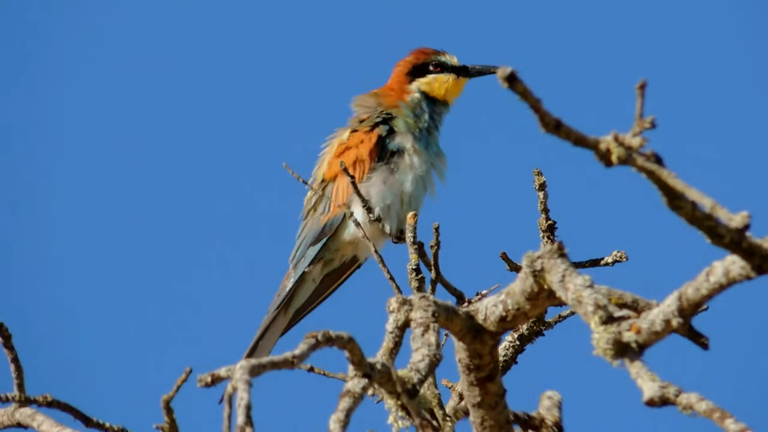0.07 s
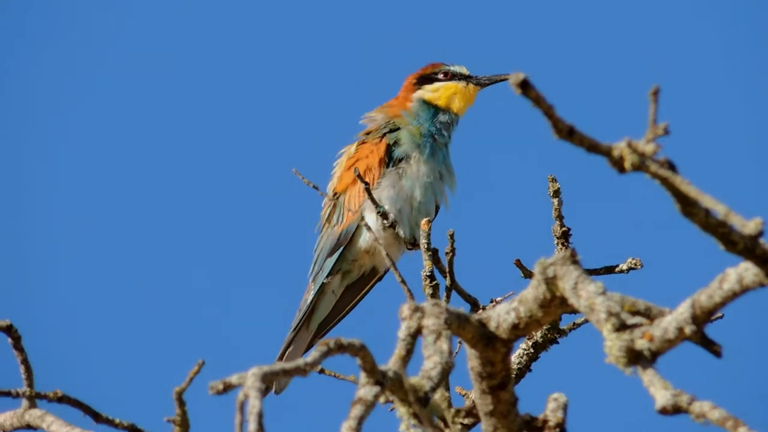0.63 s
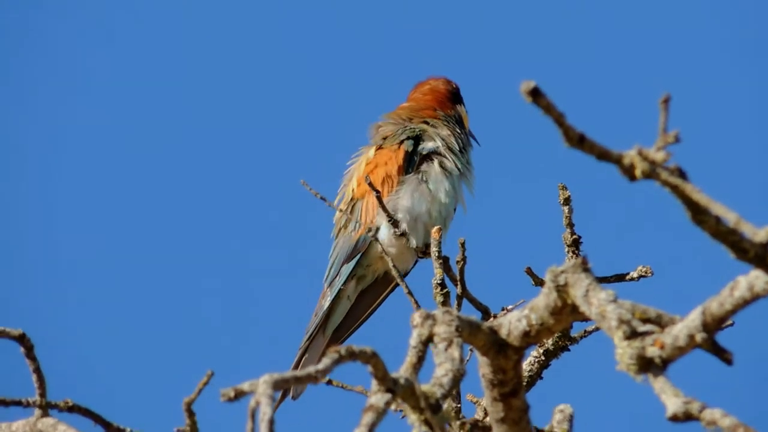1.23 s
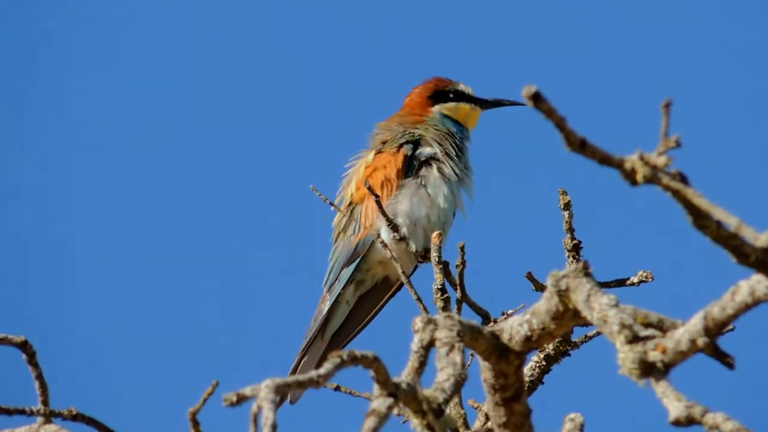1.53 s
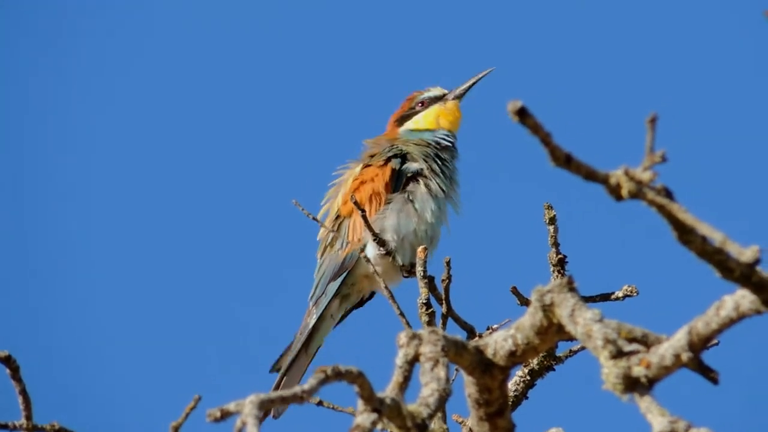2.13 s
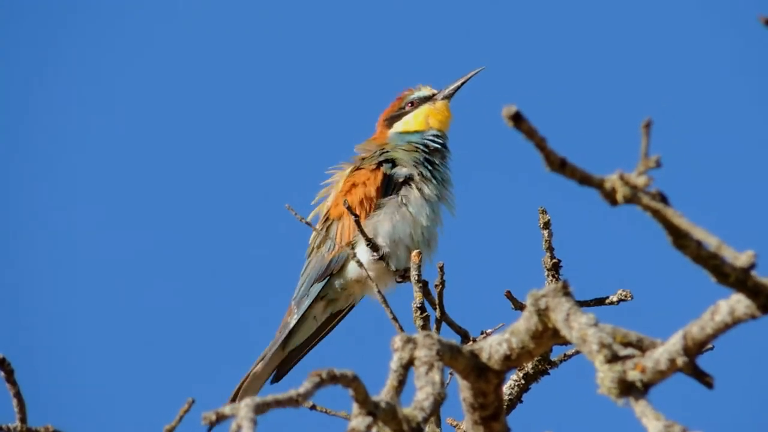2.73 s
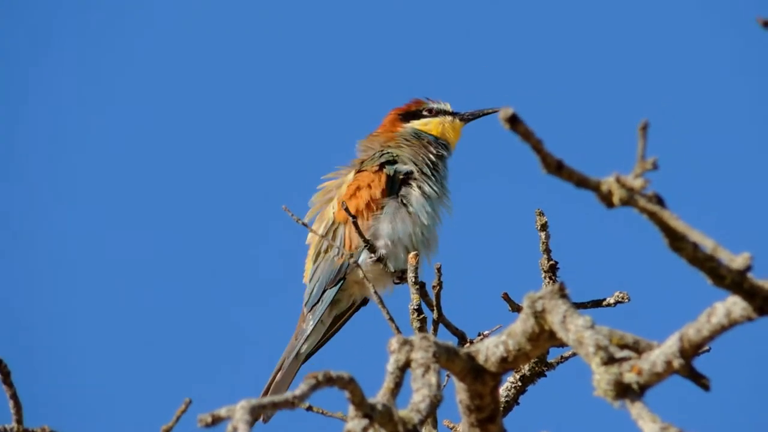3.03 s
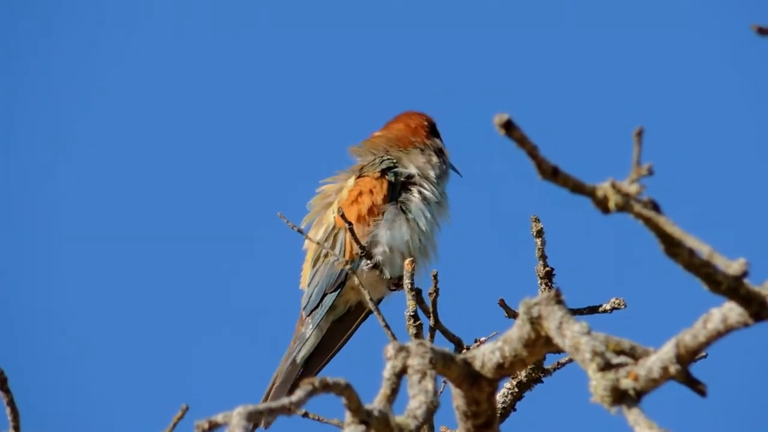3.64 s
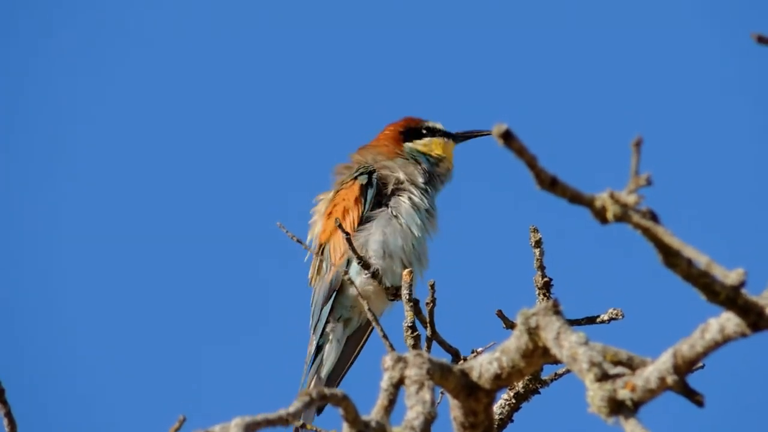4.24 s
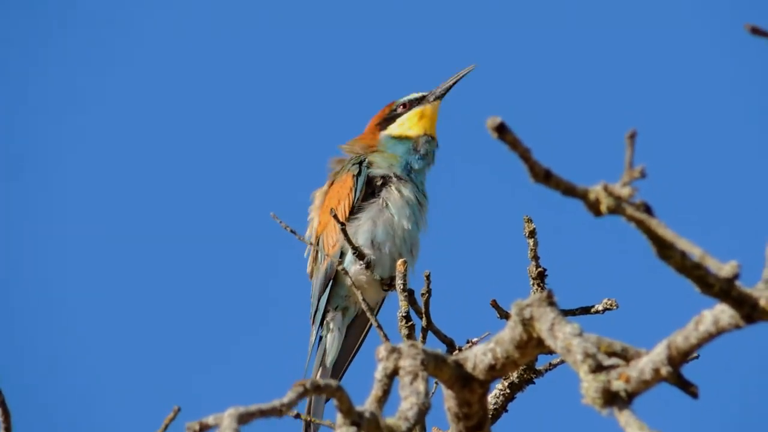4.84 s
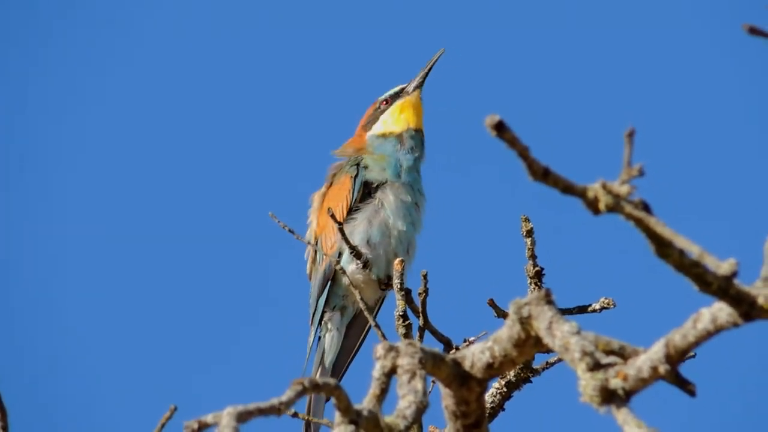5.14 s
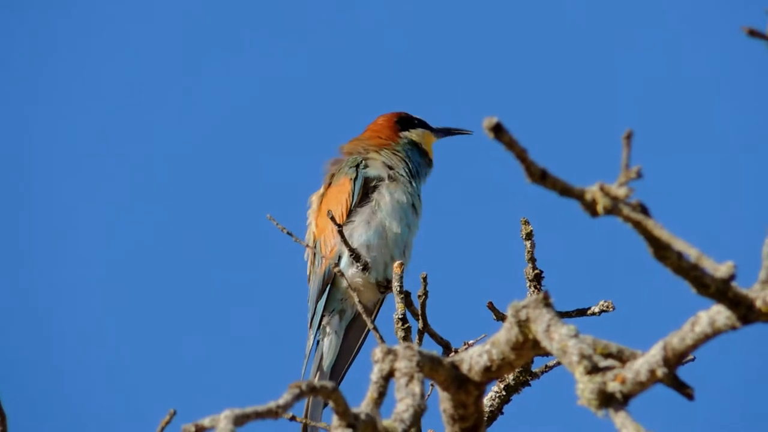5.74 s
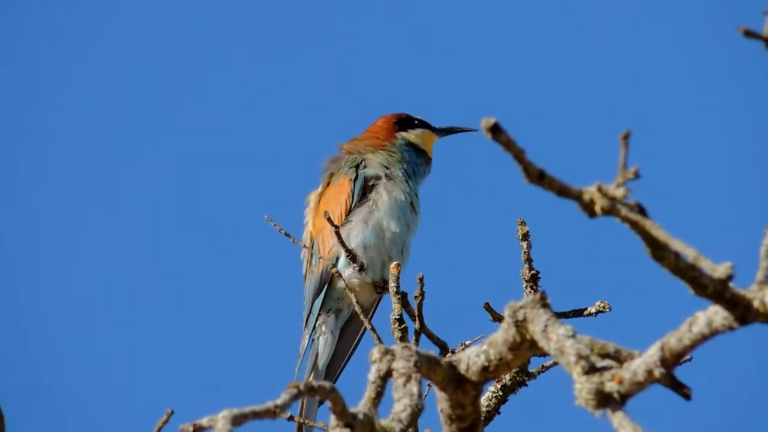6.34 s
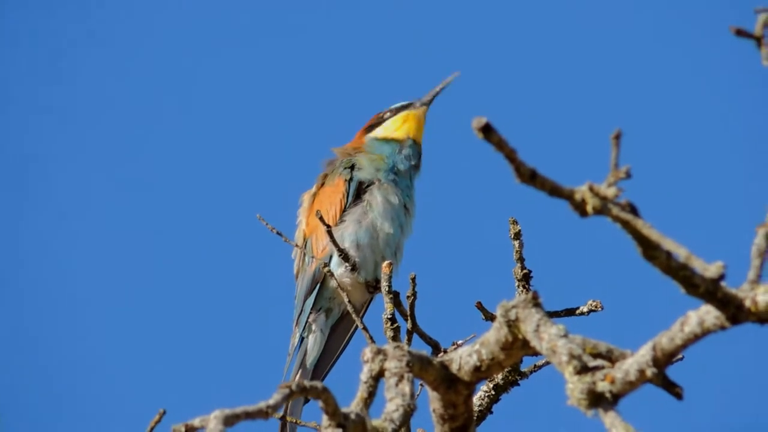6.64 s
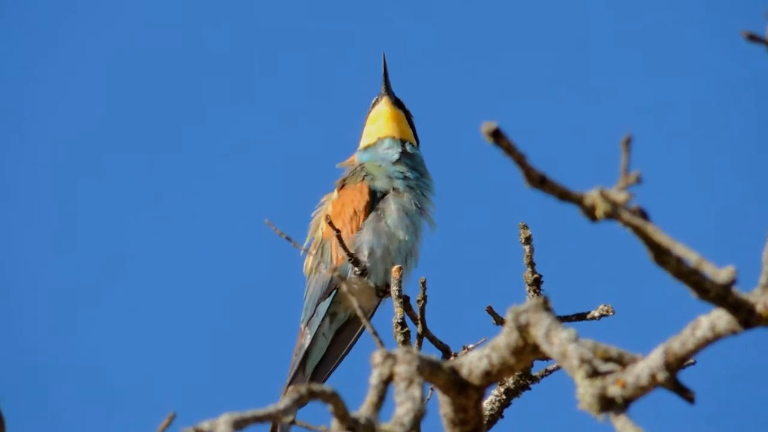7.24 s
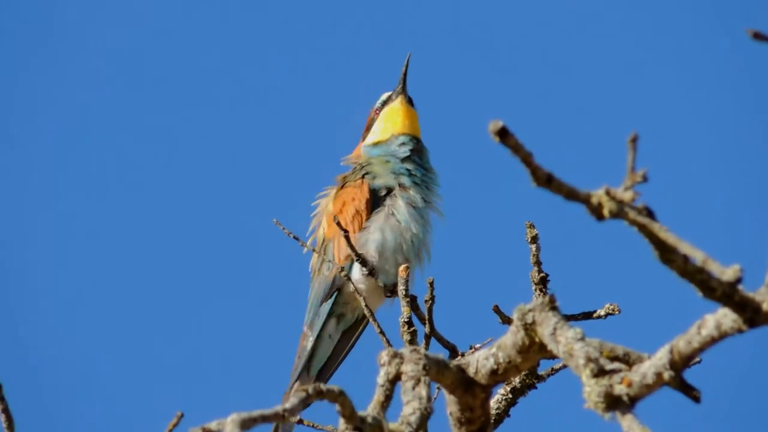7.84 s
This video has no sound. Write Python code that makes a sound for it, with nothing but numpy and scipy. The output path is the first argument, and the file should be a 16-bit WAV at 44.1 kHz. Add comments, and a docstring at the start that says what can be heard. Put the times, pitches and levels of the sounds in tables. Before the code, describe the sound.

Two bee-eaters in a dead tree trade short rolling whistles that slide up and flick higher. After a sparse start with faint calls, a small songbird twitters and one puff of wind bumps the right side of the microphone. The rolling calls then come thick and often overlapping, mixed with high chirps, and thin out toward the end. Soft open-air hiss and a low distant rumble run underneath.

```python
"""Bee-eaters in a dead tree

Two bee-eaters trade rolling, often overlapping calls: whistles that slide up, then are flicked higher.
Small songbirds twitter nearby in short swept notes. Branches and ground echo the birds.
Behind them: low distant rumble, soft open-air hiss, one bump of wind on the right."""
import sys
import numpy as np
from scipy import signal
from scipy.fft import rfft, irfft
from scipy.io import wavfile
from scipy.ndimage import uniform_filter1d

SR = 44100
rng = np.random.default_rng(int(sys.argv[2]) if len(sys.argv) > 2 else 0)


def transcribe(u):
    """Save the signal u as a 16-bit wav file named by the first command-line argument.

    u: samples, shape (n,) or (channels, n), limited to [-1, 1]; the rate is SR.
    q: integer samples, one column per channel.
    """
    v = np.clip(np.atleast_2d(u).T, -1, 1)
    q = np.round(v * 32767).astype(np.int16)
    wavfile.write(sys.argv[1], SR, q)


N = 356328
TIME = np.arange(N) / SR
FLICK_S, ROLL_HOLD_S = .011, .035

# Songbird place and tone by note shape.
# Each row: left minus right in dB, left-ear lead in ms, overtone gain in dB, pitch waver as a share.
NOTE_VOICES = {"tew": (-1.5, 0.052, -9, .016), "slur": (-1.2, 0.038, -20, .015),
               "twit": (-2.3, -.06, -6, .023), "tsip": (-3, -0.051, -8, .02),
               "chit": (.5, 0.033, -11, .018), "glide": (0, 0, -20, .004)}


def bee_eaters(gain_db):
    """All bee-eater calls, each at its own pan."""
    # Each row: start in s, slide in s, roll in s, first flick gap in s, pitch in Hz, flick top in Hz,
    # relative level in dB, left minus right in dB, timbre blend (0 bird A, 1 bird B), overtone gain in dB.
    calls = [(.323, 0.053, 0.069, 0.037, 1900, 2376, -52, 3.5, 0, -8),
             (0.411, .041, 0.027, 0.038, 1900, 2280, -56, 1, 0, -8),
             (2.663, 0.042, 0.025, 0.038, 1890, 2210, -39.5, 2, .1, -12),
             (2.783, 0.038, .057, 0.02, 1895, 2280, -30.5, -2, 0.3, 0.5),
             (3.049, 0.043, 0.026, .035, 1995, 2400, -32, -5.5, 0, 3.5),
             (3.091, 0.046, .11, 0.029, 1776, 2183, -34, 1, .24, 0),
             (3.222, .026, 0.031, .035, 1850, 2166, -37.5, 1.5, .24, 2),
             (3.433, 0.063, 0.014, .035, 1930, 2160, -30, -2.5, .04, 4.5),
             (3.512, 0.033, 0.051, 0.027, 2094, 2593, -29.5, 0, .4, -2),
             (3.546, 0.049, 0.028, 0.014, 1895, 2245, -33, -1.5, 0, 1.5),
             (3.721, 0.042, 0.029, .04, 1837, 2200, -36.5, 3, 0.3, 5),
             (3.768, .05, .087, .029, 1760, 2140, -34.5, -1, 0.36, 2.5),
             (3.888, 0.038, 0.023, .035, 1800, 2250, -30, -2, .15, 0),
             (4.074, .042, 0.046, 0.034, 1857, 2182, -34.5, 1.5, .2, -3),
             (4.122, 0.046, 0.092, 0.022, 1823, 2220, -31.5, -2.5, .1, -1),
             (4.277, 0.042, 0.093, .029, 1922, 2430, -28.5, -2.5, 0.5, 1),
             (4.455, .043, 0.019, .035, 1844, 2160, -34.5, -1, .2, 6),
             (4.49, 0.047, 0.096, 0.029, 1802, 2133, -33.5, -1.5, .25, 1),
             (4.704, 0.048, 0.092, 0.033, 1800, 2230, -32, -4, .97, -4),
             (4.85, 0.026, 0.057, 0.032, 1830, 2168, -31.5, -3, .2, -2),
             (5.072, 0.046, 0.079, 0.028, 2000, 2418, -27.5, -3, .7, 1),
             (5.108, .045, 0.05, .018, 1780, 2396, -35, -3, .4, 1),
             (5.155, 0.054, .119, .036, 1844, 2277, -30, -3, .4, 1),
             (5.446, .051, 0.097, .037, 1817, 2233, -32.5, -5, 0.76, 1),
             (5.611, .05, 0.022, .035, 1840, 2135, -30, -1, 0.2, 1.5),
             (5.83, .047, 0.028, .035, 1790, 2170, -37, -9.5, .2, -13),
             (5.885, .041, 0.039, .04, 1860, 2190, -32.5, -4, .9, -2),
             (5.918, 0.054, .12, 0.035, 1773, 2208, -35, -1.5, .1, 3),
             (6.149, .053, 0.13, 0.034, 1830, 2250, -32.5, -7.5, 0.73, -3.5),
             (6.54, 0.05, 0.03, .04, 1834, 2184, -29.5, -2.5, 0.46, 1.5),
             (6.908, 0.061, .103, 0.038, 1793, 2256, -35, -4.5, 0.9, 4.5),
             (7.338, 0.046, 0.023, .035, 1760, 2017, -39, 1, .15, -4),
             (7.421, .059, 0.024, .035, 1748, 2080, -35, 0, 0, -1),
             (7.768, .048, .029, .035, 1830, 2204, -34, -2, .1, 2),
             (7.933, 0.058, .105, 0.035, 1790, 2216, -34.5, 0, 0.04, 4.5)]
    out = np.zeros((2, N))
    for start_s, slide_s, roll_s, gap_s, hz, top_hz, db, pan_db, timbre, overtone_db in calls:
        sound = call(slide_s, roll_s, gap_s, hz, top_hz, db + gain_db, timbre, overtone_db)
        add(out, sound, start_s, pan_db)
    return out


def call(slide_s, roll_s, gap_s, hz, top_hz, level_db, timbre, overtone_db,
         rise_s=.044, full_roll_s=.07, fade_db_per_s=54, waver=.0129, second_side_db=-8):
    """Pressure builds, so pitch and level rise; flicks lift the pitch; the level dies with the pressure."""
    age_s = np.arange(0, slide_s + roll_s, 1 / SR)
    size = len(age_s)
    roll_age_s, left_s = age_s - slide_s, slide_s + roll_s - age_s
    # low, throaty catch at the onset, shallower in short calls
    catch = .26 * min(roll_s / full_roll_s, 1) ** .5 * np.exp(-(age_s / .0065) ** 2)
    slide = .16 * np.clip(1 - age_s / rise_s, 0, 1) ** 1.15
    settle = .025 * np.clip(roll_age_s / ROLL_HOLD_S, 0, 1)
    end_drop = .34 * np.exp(-left_s / .00493)
    held_hz = hz * (1 - catch - slide - settle - end_drop)
    lift_hz, raised, push_db = flicks(roll_age_s, roll_s, gap_s, held_hz, top_hz)

    slide_db = -1.5 * np.clip(-2 * roll_age_s / FLICK_S, 0, 1)
    dip_db = raised - 1
    tremble_db = 1.5 * wander(220, size)
    attack_db = -18 * np.exp(-age_s / .02)
    fade_db = -fade_db_per_s * spent_s(roll_age_s) - 25 * np.exp(-left_s / .0089)
    db = level_db + slide_db + push_db + dip_db + tremble_db + attack_db + fade_db

    first_side = syrinx((held_hz + lift_hz) * (1 + waver * wander(300, size)), timbre, overtone_db)
    # the other side of the syrinx stays low during a flick and beats roughly against the first
    second_side = syrinx(held_hz * (1 + waver * wander(300, size)), timbre, overtone_db)
    edges = np.clip(np.minimum(age_s, left_s) / .002, 0, 1)
    return (first_side + undb(second_side_db) * raised * second_side) * undb(db) * edges


def flicks(roll_age_s, roll_s, gap_s, held_hz, top_hz, min_gap_s=.017, gap_kept=.42,
           sag_hz_per_s=3890, scatter_hz=30, scatter_db=1.5, jitter_s=.0007, narrowing=.08):
    """Quickening pitch flicks that sag as pressure runs out. Returns lift in Hz, lift 0-1, push in dB."""
    lift_hz, raised, pinch_db, push_db = np.zeros((4, len(roll_age_s)))
    at_s = 0
    for k, (late, high, loud) in enumerate(rng.standard_normal(size=(9, 3))):
        if at_s > roll_s - .008:
            break
        half_width_s = .55 * FLICK_S * np.exp(-narrowing * k)
        offset = (roll_age_s - at_s - jitter_s * late) / half_width_s
        hump = np.exp(-np.abs(offset) ** np.where(offset < 0, 3.5, 2.3))
        peak_hz = top_hz - sag_hz_per_s * spent_s(at_s) + scatter_hz * high
        lift_hz = np.maximum(lift_hz, hump * (peak_hz - held_hz))
        raised = np.maximum(raised, hump)
        # flow is pinched just before each flick, which comes with a new push of air
        pinch_db = np.maximum(pinch_db, 7 * np.exp(-((offset + 1.35) / .45) ** 2))
        push_db[offset > -1] = scatter_db * loud
        at_s += min_gap_s + (gap_s - min_gap_s) * gap_kept ** k
    return lift_hz, raised, uniform_filter1d(push_db, size=90) - pinch_db


def spent_s(roll_age_s):
    """Time for which pressure has been running out, after the roll's short hold."""
    return np.maximum(roll_age_s - ROLL_HOLD_S, 0)


def syrinx(hz, timbre, overtone_db, valley_db=-48, knee_hz=1650, low_loss_db=15):
    """Near-pure whistle; faint overtones light up as they cross the throat resonances."""
    # Each row: centre in Hz, width in Hz, gain in dB for bird A, gain in dB for bird B.
    # A is bright near 4.4 and 12.5 kHz, B near 8.6 kHz; timbre 0-1 blends from A to B.
    throat_resonances = [(3450, 330, -39, -34), (4380, 760, -26, -36.5), (5350, 1060, -32, -38.5),
                         (8600, 1080, -43, -23), (10300, 990, -35.5, -48), (12550, 1200, -26, -43)]
    phase = 2 * np.pi * np.cumsum(hz) / SR
    # the small throat radiates low pitches poorly
    out = np.sin(phase) * undb(-low_loss_db * np.clip(1 - hz / knee_hz, 0, 1))
    flutter_rad = .11 * wander(2500, len(hz))
    for k in range(2, 8):
        gain = undb(valley_db)
        for centre_hz, width_hz, bird_a_db, bird_b_db in throat_resonances:
            peak = undb(bird_a_db + timbre * (bird_b_db - bird_a_db))
            gain = gain + peak * resonance(k * hz, centre_hz, width_hz)
        out += undb(overtone_db + 3.4 * wander(400, len(hz))) * gain * np.sin(k * (phase + flutter_rad))
    return np.sqrt(2) * out


def songbirds(gain_db, dulling_db_per_note=1.1):
    """Runs of one note that slow and dull as they go, plus lone notes."""
    # Each row: shape, start in s, end in s, first gap in s, slowing per note in s, note length in s,
    # pitch in Hz, fall per note in Hz, relative level in dB, first-note offset in dB.
    runs = [("tew", 1.763, 2.5, .0758, .0025, .054, 3330, 0, -42.5, -1),
            ("slur", 2.909, 3.29, .0715, .0085, 0.023, 3360, 3.06, -41, -8.5),
            ("twit", 3.357, 3.88, .066, 0.0011, .034, 5720, 54.7, -38, 1.5),
            ("tsip", 3.419, 3.66, .0685, 0.00049, .016, 6160, 5.03, -42, 1),
            ("slur", 4.244, 4.64, .065, .0155, .03, 3450, 3, -41, -15)]
    # By shape. Each row: start in s, length in s, pitch in Hz, relative level in dB.
    lone_notes = { "slur": [(.021, 0.018, 3900, -47), (.069, 0.014, 3520, -51), (7.643, 0.018, 3320, -61)],
                  "twit": [(3.309, 0.019, 5070, -36), (5.712, .025, 5400, -57), (5.785, .025, 5500, -53.5),
                  (5.847, 0.017, 5510, -46.5), (6.643, .02, 5350, -50), (6.713, .0078, 5400, -43.5)],
                  "tsip": [(1.36, .025, 6300, -60), (3.586, 0.021, 6100, -45.5), (3.764, 0.021, 6200, -45),
                  (4.054, .015, 5570, -53.5), (7.255, .02, 6400, -58), (7.408, .015, 6060, -51)],
                  "chit": [(.006, .015, 4400, -37.5), (.052, .018, 4320, -41)],
                  "glide": [(6.785, 0.049, 5300, -63), (6.825, .079, 5250, -65), (6.87, .12, 4900, -68)]}
    out = np.zeros((2, N))
    for shape, start_s, end_s, gap_s, slowing_s, length_s, hz, fall_hz, db, first_db in runs:
        at_s, k = start_s, 0
        while at_s < end_s:
            note_db = db + gain_db + first_db * (k == 0)
            sound = note(shape, length_s, hz - k * fall_hz, note_db, k * dulling_db_per_note)
            add(out, sound, at_s, pan_db=NOTE_VOICES[shape][0])
            at_s += gap_s + k * slowing_s
            k += 1
    for shape, rows in lone_notes.items():
        for start_s, length_s, hz, db in rows:
            add(out, note(shape, length_s, hz, db + gain_db), start_s, pan_db=NOTE_VOICES[shape][0])
    return out


def note(shape, length_s, hz, db, dull_db=0, throat_hz=5900, throat_width_hz=950, upper_db=-14):
    """Short swept stereo whistle; its octave lights up as it crosses the throat resonance."""
    # Note contours by shape. Each point: share of the note, pitch ratio, relative level in dB.
    contours = { "tew": [(0, 1.2, -19), (.12, 1.07, 1), (.3, 1, -7.5), (.58, .99, -5.5), (.75, .95, 3),
                (.9, 0.824, -3.5), (1, 0.7, -15)], "slur": [(0, 1.4, -12), (.12, 1.23, 2.5),
                (.3, 1.02, 0.5), (.6, .84, 2), (1, 0.74, -7.5)], "twit": [(0, .65, -19), (.16, .83, -8),
                (.4, 0.97, -1), (.7, 1, -3), (1, .93, -20)], "tsip": [(0, 1.12, -11), (.3, 1.03, 1),
                (.65, .95, 0), (1, 0.81, -13)], "chit": [(0, 0.61, -2), (.2, 1.2, -6), (.4, .93, 1.5),
                (.6, 1.02, -3.5), (1, 0.89, -14)], "glide": [(0, .9, -9.5), (.3, .97, 1.5), (.7, 1.02, -3),
                (1, 1.05, -10)]}
    share, ratio, contour_db = np.transpose(contours[shape])
    _, lead_ms, overtone_db, waver = NOTE_VOICES[shape]
    progress = np.linspace(0, 1, int(length_s * SR))
    size = len(progress)
    loud, high, bright = rng.standard_normal(size=3)
    sweep = uniform_filter1d(np.interp(progress, share, ratio), size=90)
    pitch_hz = hz * (1 + .0077 * high) * sweep * (1 + waver * wander(402, size))
    lead_cycles = np.outer([1, 0], pitch_hz * lead_ms / 1000)
    phase = 2 * np.pi * (np.cumsum(pitch_hz) / SR + lead_cycles)
    overtones = np.sin(2 * phase) * resonance(2 * pitch_hz, throat_hz, throat_width_hz)
    for k in range(2, 5):
        overtones += undb(upper_db) * np.sin(k * phase) * (k * pitch_hz < SR / 2)
    overtones *= undb(overtone_db - dull_db + 3 * bright)
    quiver_db = 2 * wander(247, size)
    envelope = undb(db + loud + np.interp(progress, share, contour_db) + quiver_db)
    return np.sqrt(2) * envelope * signal.windows.tukey(size, .15) * (np.sin(phase) + overtones)


def tree_echoes(birds, echo_db, twigs_db, twigs_t60_s, far_db, far_t60_s):
    """Direct sound plus branch and ground echoes, brief twig scatter and a faint tail from far trees."""
    # One table per ear. Each row: delay in ms, relative gain in dB.
    left_echoes = [(4.9, -30), (6.15, -20), (15.6, -6), (23.1, -9.5)]
    right_echoes = [(4.05, -12.5), (5.74, -16), (14.7, -13), (32.8, -13.5)]
    t = TIME[:SR]
    onset = np.minimum(t / .0046, 1)
    out = []
    for ear, echoes in zip(birds, (left_echoes, right_echoes)):
        response = np.zeros(SR)
        response[0] = 1
        for delay_ms, db in echoes:
            response += undb(db + echo_db) * np.sinc((t - delay_ms / 1000) * SR)
        for db, t60_s in ((twigs_db, twigs_t60_s), (far_db, far_t60_s)):
            tail = rng.standard_normal(SR) * np.exp(-np.log(1000) * t / t60_s) * onset
            response += undb(db) * tail / np.linalg.norm(tail)
        out.append(signal.fftconvolve(ear, response)[:N])
    return np.array(out)


def wind_bump(at_s=2.411, width_s=.0041, gain_db=-20):
    """A puff of wind bumps the right microphone once: a suck, then a push."""
    offset = (TIME - at_s) / width_s
    return np.outer([0, 1], undb(gain_db) * offset * np.exp(-offset ** 2))


def open_air(level_db=-51.09, swell_db=.5, pan_db=.5):
    """Steady distant rumble and soft hiss."""
    # Each row: frequency in Hz, relative spectral density in dB.
    spectrum = [(12, -48), (20, 4), (48, -4), (81, 1.5), (116, -8), (218, -12), (446, -18), (711, -18.5),
                (1170, -23), (1810, -24), (2190, -24.5), (2590, -24), (3500, -26.5), (3900, -26.5),
                (14200, -31)]
    # Each row: frequency in Hz, side minus mid in dB.
    stereo_width = [(30, -4), (80, -14.5), (170, -11), (350, -4), (800, -1.5), (3000, 1), (12000, 0.5)]
    hz = np.fft.rfftfreq(N, 1 / SR)
    gain = curve_gain(spectrum, hz)
    mid = irfft(rfft(rng.standard_normal(N)) * gain, N)
    side = irfft(rfft(rng.standard_normal(N)) * gain * curve_gain(stereo_width, hz), N)
    air = np.array([mid + side, mid - side]) / mid.std()
    return air * undb(level_db + swell_db * wander(2.33, N)) * pan_gains(pan_db)


def far_drone(level_db=-62, band_hz=(75, 83), swell_db=2):
    """Far-off drone: a narrow noise band that slowly swells and ebbs."""
    drone = signal.sosfilt(signal.butter(2, band_hz, "band", fs=SR, output="sos"), rng.standard_normal(N))
    return drone / drone.std() * undb(level_db + swell_db * wander(.46, N))


def undb(db):
    """Decibels to gain."""
    return 10 ** (np.asarray(db) / 20)


def wander(rate_hz, size):
    """Smooth random wander of roughly unit spread."""
    hold = max(int(SR / rate_hz), 2)
    steps = np.repeat(rng.standard_normal(size // hold + 1), hold)
    return 1.07 * uniform_filter1d(uniform_filter1d(steps, hold), hold)[:size]


def resonance(hz, centre_hz, width_hz):
    """Gain of a resonance peak, 1 at its centre."""
    return 1 / (1 + (2 * (hz - centre_hz) / width_hz) ** 2)


def curve_gain(points, hz):
    """Gain at hz of a (Hz, dB) curve on a log-frequency axis."""
    points_hz, db = np.transpose(points)
    return undb(np.interp(np.log(hz + 1), np.log(points_hz), db))


def pan_gains(pan_db):
    """Ear gains for a left-minus-right difference."""
    return undb([[pan_db / 2], [-pan_db / 2]])


def add(out, sound, start_s, pan_db):
    """Mix a panned sound into both ears."""
    i = int(start_s * SR)
    part = sound[..., :max(N - i, 0)]
    out[:, i:i + part.shape[-1]] += pan_gains(pan_db) * part


def scene():
    """Birds and their echoes over the background."""
    rolls = tree_echoes(bee_eaters(gain_db=.5), echo_db=-4.5,
                        twigs_db=-3.5, twigs_t60_s=.04, far_db=-18.5, far_t60_s=.97)
    twitter = tree_echoes(songbirds(gain_db=1), echo_db=-7.5,
                          twigs_db=-7.5, twigs_t60_s=.051, far_db=-18, far_t60_s=.98)
    return rolls + twitter + wind_bump() + open_air() + far_drone()


def record(dry):
    """Steep low-pass cuts the top treble."""
    cutoff_hz = 14250
    return signal.sosfilt(signal.ellip(10, .1, 70, cutoff_hz, fs=SR, output="sos"), dry)


dry = scene()
out = record(dry)
transcribe(out)
```